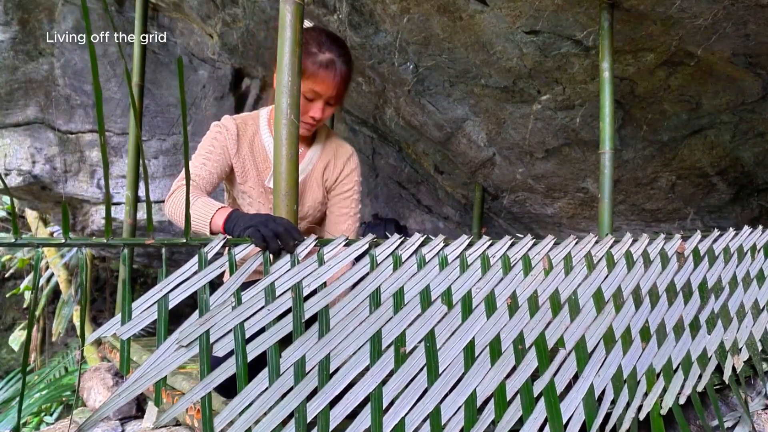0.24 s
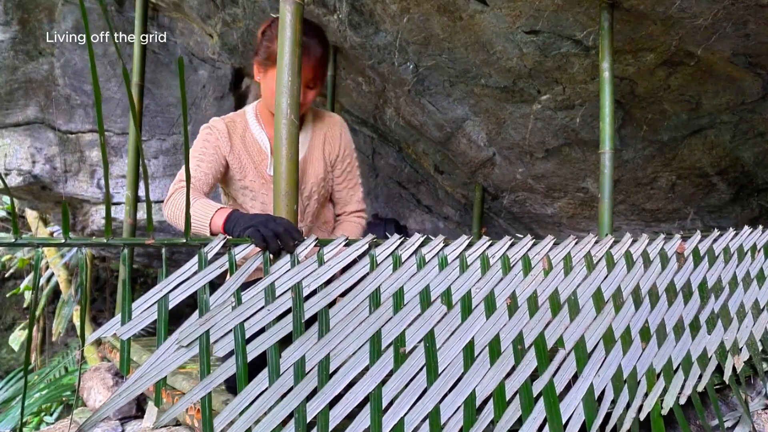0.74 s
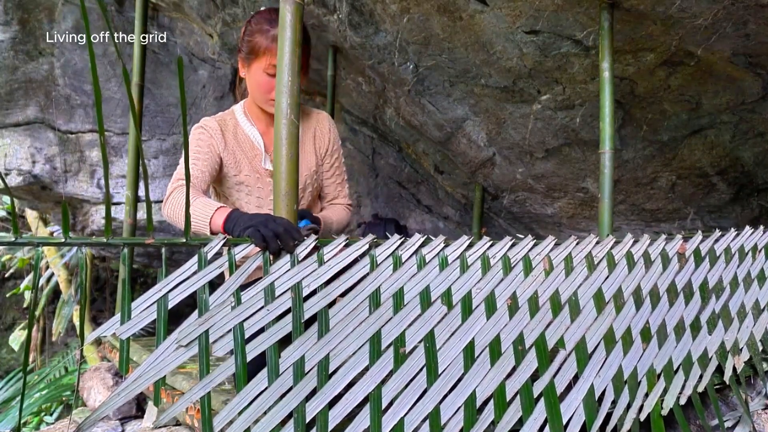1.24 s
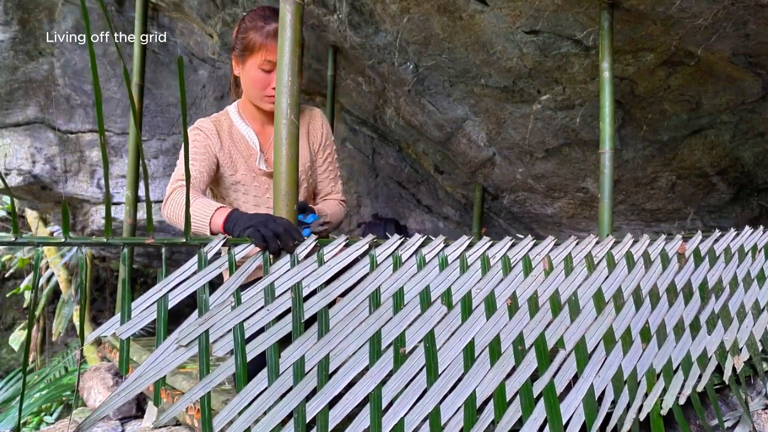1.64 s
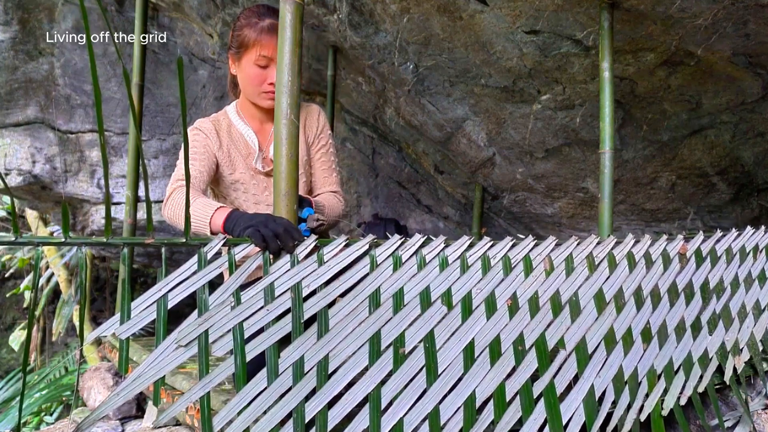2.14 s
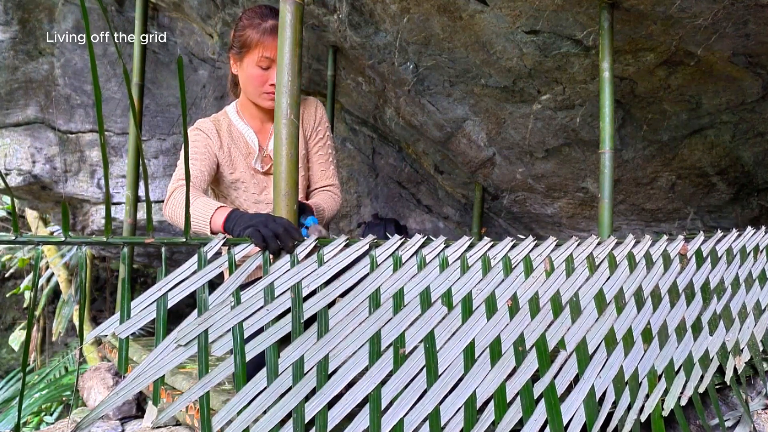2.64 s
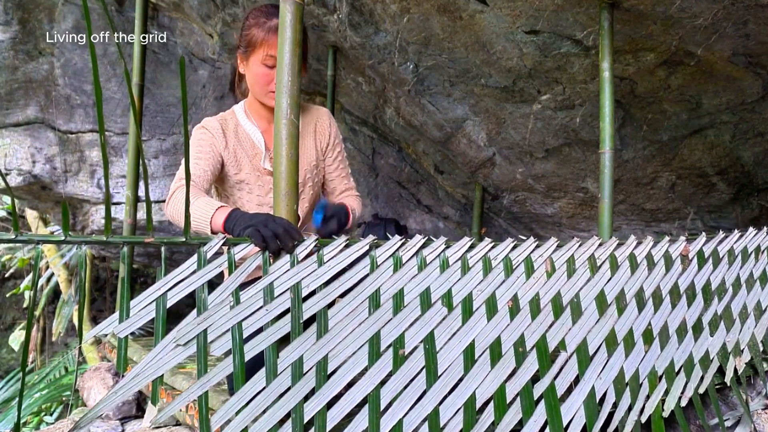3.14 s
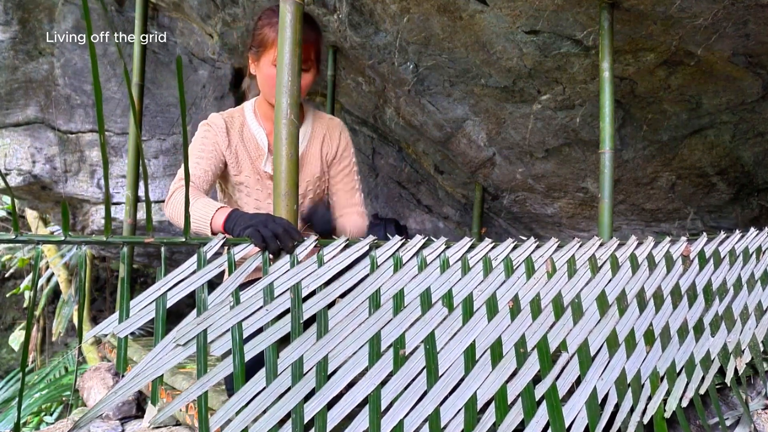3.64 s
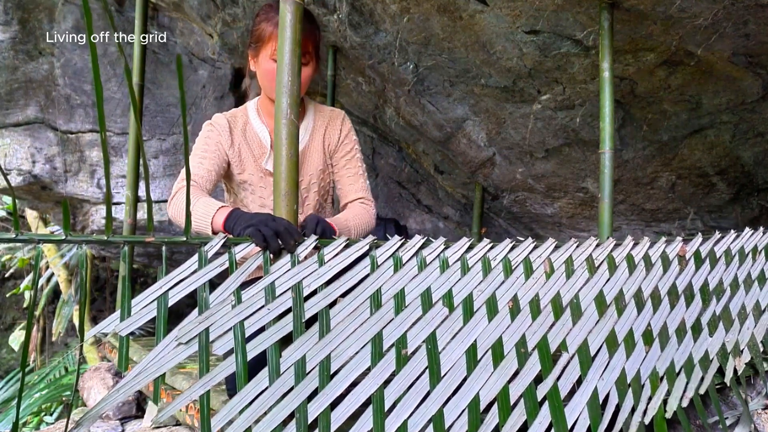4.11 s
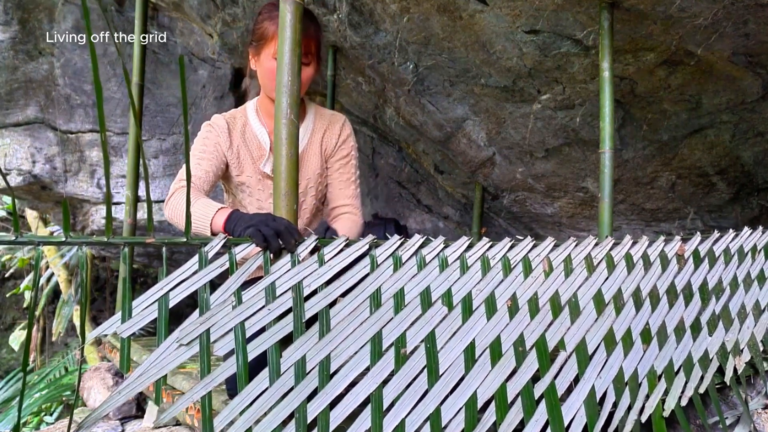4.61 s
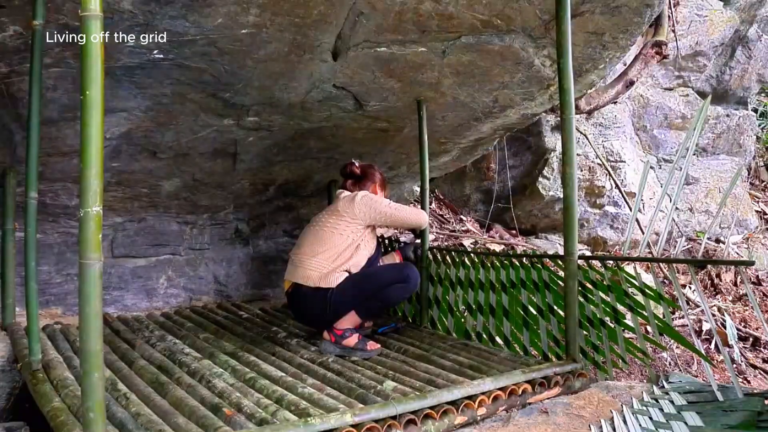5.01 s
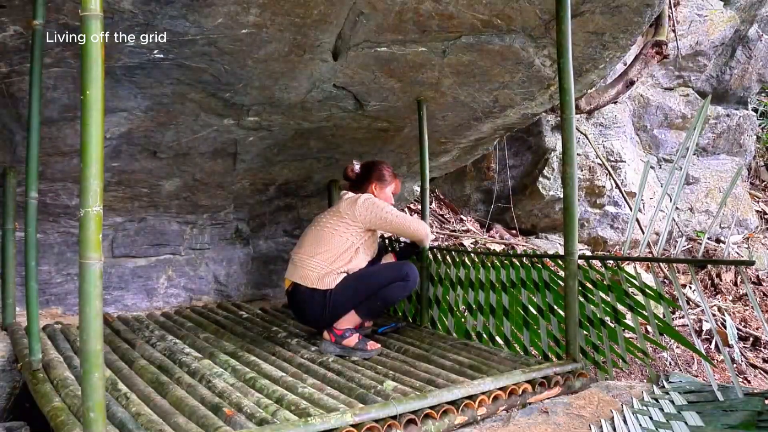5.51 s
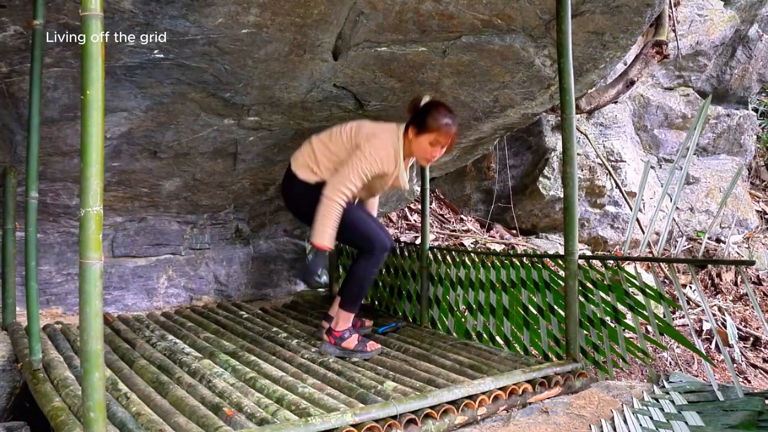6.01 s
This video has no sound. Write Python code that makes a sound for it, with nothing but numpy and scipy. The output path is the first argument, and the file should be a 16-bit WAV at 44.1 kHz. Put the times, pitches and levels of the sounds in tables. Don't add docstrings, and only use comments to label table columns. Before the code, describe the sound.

Dry bamboo weaving outdoors: sharp ticks, short fibrous scrapes and a few woody knocks, separated by quiet gaps of soft airy hiss.

```python
import sys
import numpy as np
from scipy import signal
from scipy.fft import rfft, irfft
from scipy.io import wavfile
from scipy.ndimage import uniform_filter1d

SR = 44100
rng = np.random.default_rng(int(sys.argv[2]) if len(sys.argv) > 2 else 0)


def transcribe(u):
    v = np.clip(np.atleast_2d(u).T, -1, 1)
    q = np.round(v * 32767).astype(np.int16)
    wavfile.write(sys.argv[1], SR, q)


def how_loud(loudness_db):
    steps = np.asarray(loudness_db, float) / 20
    return 10 ** steps


N = 276066


def strokes():
    # pitch_hz, width_hz, level_db
    strip_modes = [(1520, 81, -9.5), (1857, 81, 9.5), (2207, 25, 0), (2370, 90, 8), (2820, 18, -11),
                   (3180, 29, 7.5), (3487, 19.5, -0.5), (4305, 212, 10.5)]
    # pitch_hz, width_hz, level_db
    edge_modes = [(3970, 730, -9.5), (4630, 110, 12), (5160, 525, -5), (5900, 63, 14)]
    # pitch_hz, level_db (per Hz)
    fibre_colour = [(3820, -19), (7100, 0.5), (8700, -3), (10100, -3.5), (14300, -10), (15100, -8.5),
                    (16100, -39.5), (16500, -61)]
    ring, scrape, fizz, pitch = laid(hands(), count=3)
    drive = slips(per_s=3000, spread_db=1.8)
    held = resonate(resonate(drive, pitch, 4000), pitch, 4200)
    loose_end = evened(resonate(drive, pitch, 824))
    strip = band(body(held, strip_modes, skirt=1.18) + 0.25 * loose_end, 1110, 3700)
    edge = band(body(slips(per_s=8300, spread_db=-5.5), edge_modes, skirt=3.5), 3470, 6720)
    fine = slips(per_s=9100, spread_db=-0.5)
    fibre = evened(coloured(fine, read(fibre_colour, np.fft.rfftfreq(N, 1 / SR))))
    return ring * strip + scrape * edge + fizz * fibre


def hands():
    # start_s, level_db, fade_s (per 30 dB), brightness_db, pitch_hz (free strip)
    flicks = [(.029, -31.5, 0.0316, -1, 3330), (0.169, -53, .033, -4, 2000), (0.233, -63, 0.23, 1, 1980),
              (.388, -58, 0.62, 1, 1840), (1.644, -64, -0.02, 7, 2070), (1.816, -52, .11, 0.5, 2070),
              (2.002, -55.5, 0.11, 1, 2300), (2.050, -39, 0.0472, 3.5, 1900),
              (2.658, -32.5, 0.07, 2.5, 2776), (2.888, -54.5, 0.24, -8.5, 2360),
              (3.062, -75.5, 0.6, 6, 2400), (3.487, -45, 0.1664, 1, 2890), (3.179, -43, 0.1032, -1.5, 3680),
              (3.569, -30.5, 0.1133, -37, 1770), (4.008, -42, 0.11, -2, 2560),
              (4.073, -40, 0.1452, -14, 2300), (4.087, -35.5, .15, 3.5, 2580),
              (4.209, -43.5, 0.1334, -6.5, 2510), (4.524, -61.5, 0.24, -1, 2420),
              (4.793, -58.5, 0.05, 4, 1690), (4.911, -45.5, .09, -0.5, 2740),
              (5.274, -67.5, 0.28, 4.5, 2140), (6.139, -26, .055, -6.5, 1600)]
    # top_s, level_db, fade_s (per 30 dB), brightness_db, pitch_hz (free strip)
    pushes = [(0.062, -37, 0.0757, -2, 2500), (2.9, -51, .15, -21.5, 2450), (4.129, -39, 0.0256, -9, 2850),
              (0.464, -33.5, 0.0934, -5.5, 3060), (0.482, -30.5, 0.05, -4, 2800),
              (1.57, -66, 0.9, -3, 1700), (2.094, -54, 0.16, -3, 1710), (3.509, -31.5, 0.0736, -20, 3000),
              (3.519, -26.5, 0.0453, -30, 2700), (3.591, -36.5, 0.0957, -5.5, 1880),
              (3.660, -64.5, 1, -2, 1900), (3.9, -34, 0.1127, 2.5, 2440), (4.901, -47, -0.06, -11, 2580),
              (6.135, -30.5, 0.07, -4.5, 1670)]
    # start_s, level_db, length_s, brightness_db, pitch_hz (free strip)
    drags = [(.001, -57.5, .018, -5, 2140), (0.34, -62, 0.015, -8, 1390), (0.44, -61.5, 0.026, -9, 1900),
             (0.89, -70, 0.16, -17, 1990), (.550, -69, 0.048, -1.5, 2700),
             (1.875, -64.5, 0.096, -1.5, 2290), (2.682, -49.5, 0.078, 0, 2490),
             (2.824, -61.5, 0.073, -4, 2360), (4.16, -52.5, 0.039, -20, 2600),
             (4.228, -50.5, 0.031, -32, 2170), (4.285, -58.5, 0.0145, -24, 1630),
             (4.540, -74.5, .08, -1, 2300), (4.837, -62.5, 0.105, -10.5, 2000), (5.135, -82, .1, 13, 1930),
             (6.18, -57.5, 0.046, -7, 1800)]
    contact_s = .0313
    events = []
    for s, db, fade, *tone in flicks:
        shape = swell(s, 0, fade, rise_db_per_s=806.5, lead_s=.017, creep_db=14)
        events.append(stroke(shape, db, *tone))
    for s, db, fade, *tone in pushes:
        shape = swell(s, .004, fade, rise_db_per_s=761.5, lead_s=contact_s)
        events.append(stroke(shape, db, *tone))
    for s, db, length, *tone in drags:
        shape = swell(s, length, fade_s=.105, rise_db_per_s=600, lead_s=contact_s)
        events.append(stroke(shape, db, *tone))
    return events


def stroke(shape, strength_db, bright_db, hz):
    at, t, db = shape
    lead_share, dull_share = .12, .25
    dulled = np.where(t > 0, 1 + dull_share, 1 - lead_share) * db + strength_db
    scrape_db = -0.5 + .63 * bright_db + 4 * np.log2(hz / 2400)
    sag_per_s = .27
    return at, [db + strength_db, dulled + scrape_db, dulled + bright_db], hz * (1 - sag_per_s * np.maximum(t, 0))


def swell(s, hold_s, fade_s, rise_db_per_s, lead_s, creep_db=0):
    hold_s, fade_s = abs(hold_s), abs(fade_s)
    first = max(round((s - lead_s) * SR), 0)
    last = min(round((s + hold_s + 2 * fade_s) * SR), N)
    at = np.arange(first, last)
    t = at / SR - s
    rise_db = rise_db_per_s * t - creep_db
    fade_db = -30 * np.maximum(t - hold_s, 0) / fade_s
    return at, t, np.where(t < 0, rise_db, fade_db)


def laid(events, count):
    power, pitch = np.full((count, N), 1e-14), np.full(N, 1e-11)
    for at, layers_db, hz in events:
        power[:, at] += how_loud(layers_db) ** 2
        pitch[at] += hz * how_loud(layers_db[0]) ** 2
    levels = uniform_filter1d(np.sqrt(power), size=90)
    return *levels, uniform_filter1d(pitch / power[0], size=200)


def slips(per_s, spread_db):
    # pitch_hz, likeness (0 to 1)
    stroke_same = [(60, 0.42), (180, 1), (550, 0.83), (1650, 0.66), (4970, 0.17), (15000, 0.18)]
    size = how_loud(spread_db * np.minimum(rng.exponential(1, N), 4))
    size *= rng.random(N) < per_s / SR
    smear = np.exp(-np.arange(64) / 17.0)
    return paired(signal.lfilter(smear, [1], size) * rng.standard_normal((2, N)), stroke_same)


def body(drive, modes, skirt):
    rung = 0
    for k, (hz, width, db) in enumerate(modes):
        rung = rung + (-1) ** k * how_loud(db) * resonate(drive, hz, width)
    return evened(rung) + skirt * evened(drive)


def resonate(x, hz, width):
    turn = np.exp(2j * np.pi * np.cumsum(hz * np.ones(x.shape[-1])) / SR)
    r = np.exp(-np.pi * width / SR)
    return 2 * (turn * signal.lfilter([1 - r], [1, -r], x / turn)).real


def frame():
    # pitch_hz, width_hz, level_db
    pole_modes = [(258.7, 4.8, -5), (565, 5.4, -9), (758, 25, -3)]
    level, pitch = laid(jolts(), count=1)
    drive = slips(per_s=900, spread_db=1.5)
    pole = evened(resonate(drive, pitch, 132))
    thud = evened(resonate(resonate(drive, .85 * pitch, 700), .85 * pitch, 710))
    return level * band(.56 * body(drive, pole_modes, skirt=.38) + .25 * pole + 2.1 * thud, 79, 1250)


def jolts():
    # start_s, level_db, hold_s, fade_s (per 30 dB), pitch_hz (pole)
    knocks = [(.026, -60.5, 0.049, -0.4, 525), (.352, -61, 0.018, -0.3, 450),
              (0.377, -56.5, 0.0025, 0.5, 323), (0.459, -43, 0.025, 0.11, 530),
              (1.818, -69, .003, 0.2, 483), (2.07, -63, 0.0033, 0.1, 466), (2.64, -66, 0.06, 1.05, 526),
              (3.518, -33.5, 0.0036, 0.0774, 770), (3.572, -34.5, 0.012, 0.1025, 600),
              (3.644, -58.5, .003, 0.3, 477), (3.899, -53, .003, .1, 610),
              (4.004, -64.5, 0.054, -0.94, 695), (4.11, -55, .003, 0.23, 830),
              (4.175, -69, 0.099, 0.1, 764), (4.91, -60.5, .003, -0.28, 704),
              (6.141, -36, 0.0054, 0.09, 696)]
    events = []
    for s, db, hold, fade, hz in knocks:
        at, _, shape_db = swell(s, hold, fade, rise_db_per_s=665.5, lead_s=.0313)
        events.append((at, [shape_db + db], hz))
    return events


def ticks():
    # start_s, crack_db (peak), ring_db (peak), low_hz, high_hz (the two rings)
    dry_ticks = [(.1700, -48, -48, 1803, 2395), (.2360, -48, -52, 2546, 5151),
                 (.3871, -38, -41, 1824, 2304), (1.5614, -58, -54, 1195, 2713),
                 (1.5776, -50, -56, 1803, 2207), (1.6441, -49, -52, 2142, 5770),
                 (2.5720, -32, -46, 7600, 14500), (3.1983, -35, -37, 4392, 5092),
                 (3.7974, -42, -42, 5500, 7400), (3.8642, -30, -30, 1173, 2900),
                 (4.7941, -40, -52, 1571, 5770), (5.2775, -46, -54, 1900, 4963),
                 (.0276, -24, -20, 4096, 5300), (.4586, -14, -11, 3900, 5600),
                 (3.1792, -19, -24, 3682, 5065)]
    snaps = [(.0608, -32, -25, 2632, 2750), (.4850, -40, -24, 2400, 2700), (1.8172, -40, -47, 1588, 5910),
             (2.0041, -46, -46, 2955, 5400), (2.6580, -8, -22, 1800, 5151), (4.0110, -33, -33, 2820, 3989),
             (4.0870, -24, -28, 2320, 3972), (4.2122, -35, -32, 1824, 3014), (4.5255, -50, -48, 2406, 2440),
             (4.9113, -36, -33, 1625, 4505), (6.1285, -30, -26, 1754, 2110), (6.1410, -25, -18, 1450, 1850)]
    taps = [
        (.0630, -60, -37, 1300, 2650),
        (2.0488, -31, -33, 1383, 5173),
        (2.0520, -60, -46, 460, 3400),
        (2.0948, -50, -43, 1205, 2659),
        (3.5702, -45, -24, 1448, 1830),
        (3.8920, -29, -31, 1600, 2820),
    ]
    long_taps = [
        (.4740, -60, -33, 585, 745),
        (2.8885, -50, -49, 1345, 2309),
        (3.5080, -45, -27, 2790, 3275),
        (2.9300, -70, -55, 1340, 1350),
        (3.5150, -60, -33, 580, 850),
        (4.1120, -60, -46, 785, 800),
        (.4650, -60, -37, 150, 243),
        (3.5120, -60, -33, 150, 243),
        (3.5740, -60, -31, 140, 250),
    ]
    kinds = (dry_ticks, .010), (snaps, .024), (taps, .06), (long_taps, .115)
    out, t = np.zeros((2, N + 5000)), np.arange(4000) / SR
    crack_s = .0002
    late = t - crack_s
    crack = np.cos(2 * np.pi * 10800 * late) * np.exp(-(late / .00006) ** 2)
    for s, crack_db, ring_db, low_hz, high_hz, t60 in [(*row, t60) for rows, t60 in kinds for row in rows]:
        lag = [[0], [rng.uniform(-1, 1) * min(40 * t60, 2.5)]]
        lag = np.array(lag)
        ring = .55 * (np.sin(2 * np.pi * low_hz * t + lag) + np.sin(2 * np.pi * high_hz * t - lag))
        ring *= 1 - np.exp(-t / .0003)
        splinters = rng.choice([-1, 1], 40) * (rng.random(40) < .2) * how_loud(-3 - .2 * np.arange(40))
        splinters[:6] = 0
        splinters[0] = 1
        chatter = np.convolve(crack, splinters)[:len(t)]
        sound = how_loud(crack_db) * chatter + how_loud(ring_db - 60 * t / t60) * ring
        bounces = rng.standard_normal((2, 500)) * (rng.random((2, 500)) < .05)
        bounces *= how_loud(-8.5 - 30 * t[:500] / t60)
        bounces[:, :18] = 0
        bounces[:, 0] = 1
        heard = signal.fftconvolve(sound, bounces, axes=1)
        out[:, round((s - crack_s) * SR):][:, :heard.shape[1]] += heard
    return high_pass(out[:, :N], 350)


def overhang(x):
    # pitch_hz, t60_s
    rock_decay = [(300, 0.081), (2000, 0.047), (8000, 0.031), (16000, 0.011)]
    reflections = np.zeros((2, SR // 2))
    at = np.arange(140, SR // 2 - 20, 20) + rng.integers(0, 20, (2, (SR // 2 - 141) // 20))
    np.put_along_axis(reflections, at, rng.choice([-1., 1.], at.shape), 1)
    hz, t, z = signal.stft(reflections, SR, nperseg=128)
    decay_db = -60 * t / read(rock_decay, hz)[:, None]
    tail = signal.istft(z * how_loud(decay_db), SR, nperseg=128)[1]
    return signal.fftconvolve(x, tail / np.linalg.norm(tail[0]), axes=1)[:, :N]


def air():
    # pitch_hz, level_db (per Hz)
    air_colour = [(12, -19), (20, -15.5), (75, -5), (102, -5), (251, -5), (535, -1.5), (583, -6),
                  (729, -1.5), (1390, -5.5), (1600, -6.5), (4280, -13), (14700, -18), (16500, -27)]
    # pitch_hz, likeness (-1 to 1)
    air_same = [(60, 0.89), (240, -0.033), (950, -0.118), (3770, -0.082), (15000, -0.026)]
    # start_s, level_db
    hiss_levels = [
        (0.0, -63),
        (0.68, -66),
        (3.5, -66),
        (4.3, -63.5),
        (5.32, -65.5),
        (6.26, -65),
    ]
    leaf_db = 1.04
    hz = np.fft.rfftfreq(1024, 1 / SR)
    z = signal.stft(paired(rng.standard_normal((2, N)), air_same), nperseg=1024, noverlap=768)[2]
    patches = uniform_filter1d(rng.standard_normal(z.shape[1:]), 14, 0)
    patches = evened(uniform_filter1d(patches, 12, 1))
    patch_db = (1.0 + 1.0 * (hz < 250))[:, None] * patches
    treble = np.clip(np.log2(hz / 1500 + 1e-9) / 3, 0, 1)[:, None]
    z *= how_loud(read(air_colour, hz)[:, None] + patch_db + treble * leaf_db)
    hiss = signal.istft(z, nperseg=1024, noverlap=768)[1][:, :N]
    s, hiss_db = np.transpose(hiss_levels)
    return how_loud(np.interp(np.arange(N) / SR, s, hiss_db) + 3.5) * evened(hiss)


def evened(x):
    return x / np.sqrt(np.mean(x ** 2) + 1e-20)


def read(points, hz):
    f, value = np.transpose(points)
    return np.interp(np.log(hz + 1), np.log(f + 1), value)


def coloured(x, db):
    return irfft(rfft(x) * how_loud(db), x.shape[-1])


def paired(x, same):
    left, other = rfft(x)
    c = np.clip(read(same, np.fft.rfftfreq(N, 1 / SR)), -1, 1)
    return irfft([left, c * left + np.sqrt(1 - c ** 2) * other], N)


def band(x, lo_hz, hi_hz):
    return evened(signal.sosfilt(signal.butter(3, [lo_hz, hi_hz], "band", fs=SR, output="sos"), x))


def high_pass(x, hz):
    return signal.sosfilt(signal.butter(2, hz, "high", fs=SR, output="sos"), x)


def scene():
    # pitch_hz, likeness (0 to 1)
    echo_same = [(100, 0.887), (400, 1), (1500, 0.024), (6000, 0.031)]
    rubbed, snapped = strokes() + frame(), ticks()
    echo = paired(overhang(how_loud(-12.5) * rubbed + how_loud(-12) * snapped), echo_same)
    near = high_pass(how_loud(1.0) * rubbed + snapped + echo, 90)
    dip = .45 * resonate(near, 7300, 1500)
    return near - dip + air()


def roll_off(x):
    return signal.sosfilt(signal.butter(12, 16970, fs=SR, output="sos"), x)


def record(dry):
    return roll_off(dry)


dry = scene()
out = record(dry)
transcribe(out)
```